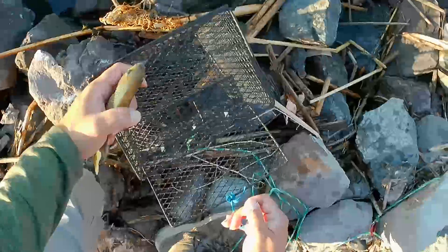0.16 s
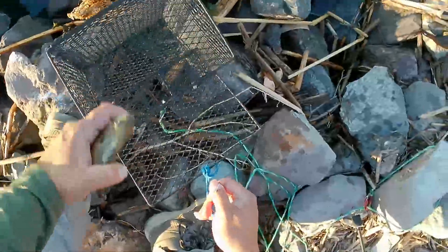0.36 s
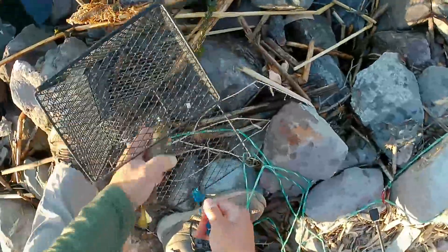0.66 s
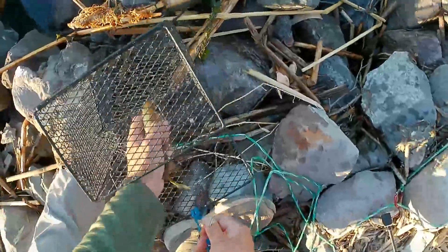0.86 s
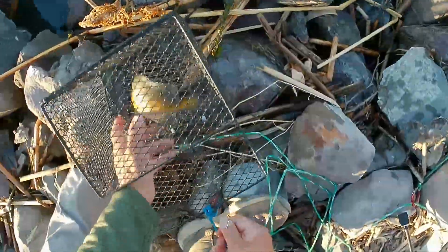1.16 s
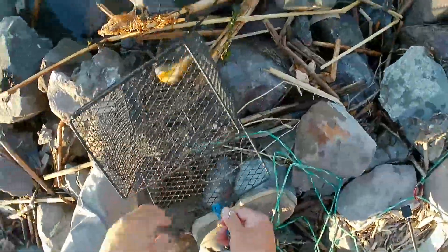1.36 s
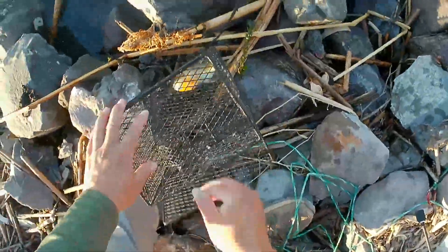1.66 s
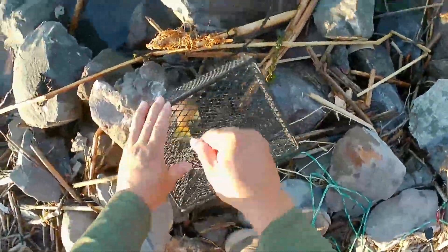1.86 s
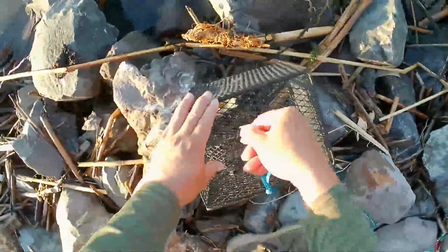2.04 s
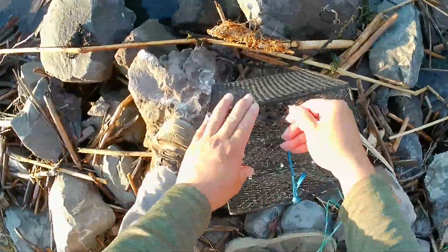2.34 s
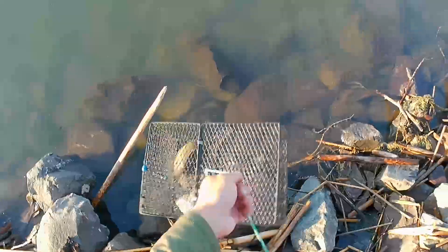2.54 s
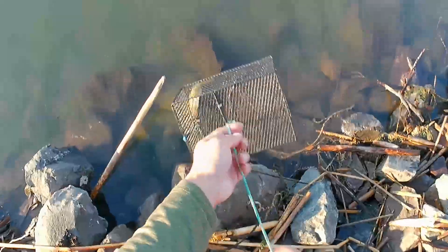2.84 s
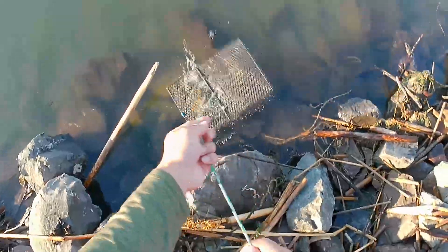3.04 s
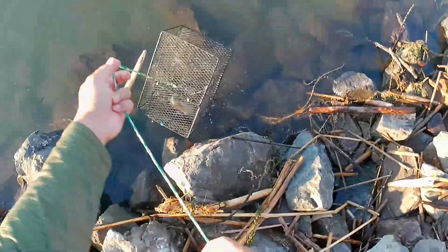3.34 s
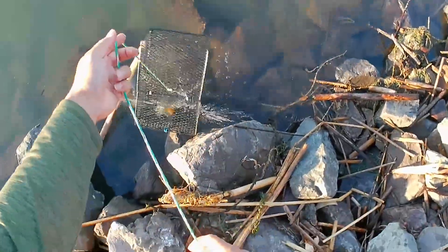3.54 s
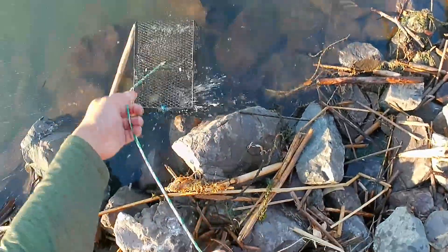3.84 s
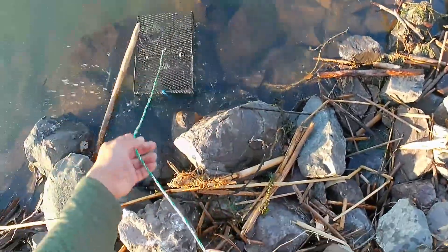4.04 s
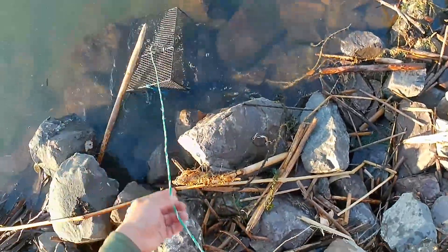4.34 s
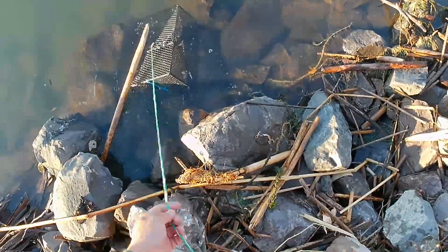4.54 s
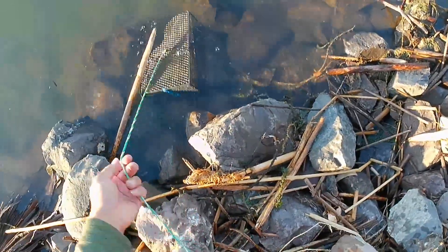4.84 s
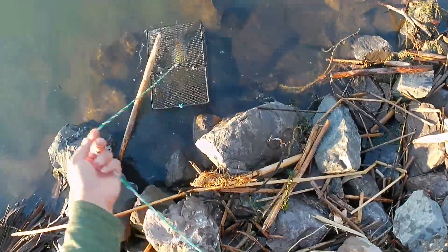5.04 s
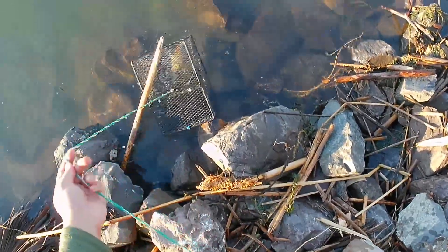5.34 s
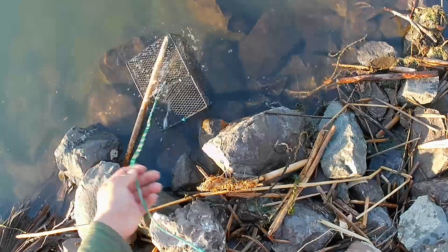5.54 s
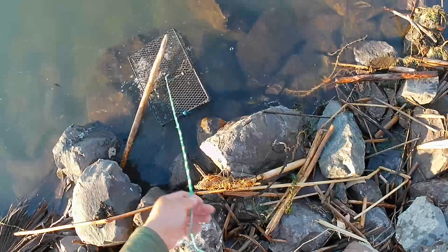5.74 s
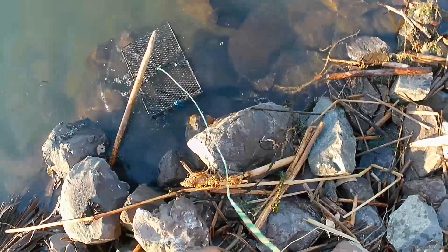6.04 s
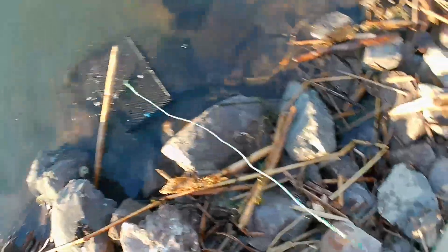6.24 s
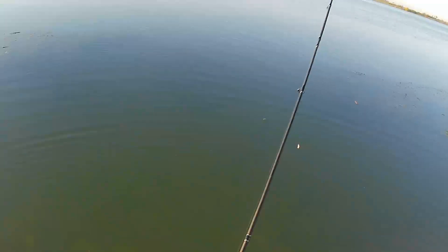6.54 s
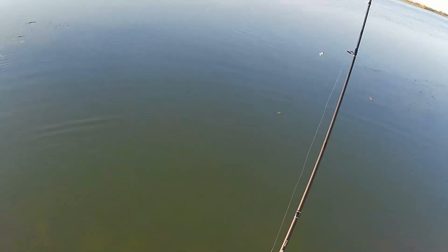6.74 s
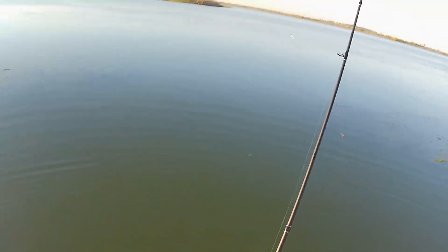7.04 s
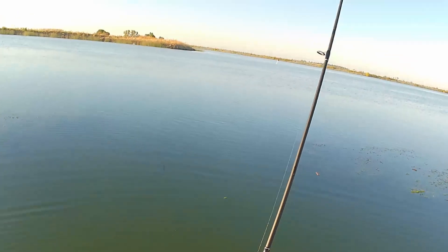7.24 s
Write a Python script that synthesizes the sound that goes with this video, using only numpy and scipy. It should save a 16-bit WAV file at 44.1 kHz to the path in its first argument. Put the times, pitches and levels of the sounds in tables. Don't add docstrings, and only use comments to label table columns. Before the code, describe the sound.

Sharp metal mesh knocks and light scrapes, a wet plunge with repeated sloshing and droplets, then quiet rumble and one handling bump.

```python
import sys
import numpy as np
from scipy import signal
from scipy.fft import rfft, irfft, next_fast_len
from scipy.io import wavfile
from scipy.ndimage import uniform_filter1d

SR = 44100
rng = np.random.default_rng(int(sys.argv[2]) if len(sys.argv) > 2 else 0)


def gain_from_decibels(decibels):
    exponent = np.asarray(decibels, float) / 20
    return 10 ** exponent


def transcribe(u):
    v = np.clip(np.atleast_2d(u).T, -1, 1)
    q = np.round(v * 32767).astype(np.int16)
    wavfile.write(sys.argv[1], SR, q)


N = 325899

# frequency in Hz, density in dB per Hz.
SHORE_COLOUR = [(4.7, -29), (8.0, 3), (21, -0.5), (43, -2.5), (90, -6.5), (140, -17.5), (186, -22),
                (248, -28), (282, -33.5), (426, -35.5), (500, -37), (831, -40.5), (1960, -50.5),
                (14100, -59), (16000, -57.5)]
# frequency in Hz, width in Hz, level in dB.
ENGINE_LINES = [(119, 6.5, -70), (162, 5.8, -70), (207, 7, -75), (255, 9, -80), (425, 9, -86)]
# frequency in Hz, level in dB.
WHINE_LINES = [(431, -78.5), (651, -84)]

# start in seconds, peak in dB, frequency in Hz, t60 in seconds.
KNOCKS = [(.595, -48.5, 230, 0.034), (1.228, -30.5, 110, .03), (1.248, -41.5, 514, .027),
          (1.278, -37, 208, 0.025), (1.297, -46.5, 483, 0.022), (1.298, -56, 900, .025),
          (1.281, -58, 850, .025), (1.23, -50, 450, .025), (1.248, -50, 900, 0.023), (1.452, -46, 800, .02),
          (1.555, -46, 250, .03), (1.451, -30.5, 275, 0.026), (1.479, -36, 825, 0.062),
          (1.8, -42, 189, 0.043), (1.81, -50, 300, .04), (1.764, -54, 450, .03), (2.106, -42.5, 230, 0.03),
          (6.396, -53, 400, .066), (6.4015, -38, 890, .012), (6.407, -30, 274, .03),
          (7.203, -50, 190, 0.062)]
# start in seconds, peak in dB, frequency in Hz, t60 in
# seconds.
HEAVES = [
    (1.262, -30.5, 53, 0.085),
    (1.341, -29.5, 16.7, 0.97),
    (6.236, -32, 19, 0.3),
    (6.279, -23.5, 24.4, 0.17),
    (6.313, -28.5, 31.4, 0.2),
    (6.357, -26, 16, 0.16),
]
# frequency in Hz, peak in dB, t60 in seconds.
FRAME_MODES = [(194, -24, 0.045), (450, -25.5, 0.018), (1200, -38, .02), (2340, -39, 0.027)]
# start in seconds, peak in dB, frequency in Hz, t60 in seconds.
WIRE_PINGS = [
    (2.158, -56, 1550, .03),
    (2.159, -60, 2750, .025),
    (2.158, -61, 4800, .02),
    (2.114, -60, 1050, .03),
    (2.113, -64, 2200, .025),
    (2.205, -64, 3100, .02),
    (1.481, -50, 1150, .04),
    (1.484, -54, 550, .05),
    (1.486, -54, 2500, .03),
]
# frequency in Hz, peak in dB, t60 in seconds.
HOUSING_MODES = [(498, -31, 0.028), (700, -27.5, 0.0087), (860, -34, 0.016), (1000, -29.5, 0.017),
                 (1430, -49, .017), (2570, -41, 0.016), (3400, -55, 0.016), (4330, -49, .014),
                 (5000, -57, .015), (10250, -29.5, 0.0059)]

# start in seconds, peak, low part and high part in dB, t60 in seconds.
BAIT_SNAPS = [(1.2104, -37, -8, 7.5, 0.027), (1.2483, -41, -4, 5, 0.027), (1.278, -57.5, -7, 0, .051),
              (1.2944, -63, -3, -8, .05), (1.3267, -56, -5, -4, .1), (1.362, -56, -6, -1, 0.068),
              (1.376, -65, 4, 2, .075), (1.441, -54, -3, 4, 0.067), (1.4515, -49, -6, -2, 0.049),
              (1.474, -31.5, 1, 2, 0.025), (1.488, -42, -2, -6, .028), (1.505, -68, -3, 15, .023),
              (1.557, -50.5, -6, -2, 0.036), (1.6255, -65, -3, 11.5, 0.033)]
# start in seconds, peak, low part and high part in dB, t60 in seconds.
DOOR_SCRAPES = [(1.7464, -60, -5, -5, .05), (1.762, -51.5, -4, -2, 0.1), (1.7982, -43.5, -10, 0, 0.036),
                (1.808, -47, 1.5, 2, .038), (1.8351, -61, 0, -10, .034), (1.844, -60.5, -11, 4, .04),
                (1.8562, -61.5, 2, -7, .062), (2.1118, -52.5, -10, 0.5, 0.054), (2.1356, -59, -5, -9, .044),
                (2.158, -46, -8, 3, 0.023), (2.1979, -58, -13, 1, 0.064), (2.204, -52.5, -1, -1, .038),
                (2.2274, -68, 4, -1, .04), (2.382, -67, -1, 4, .048), (2.4004, -63, -3, -3, .04),
                (2.4136, -69, 4.5, -1, .12)]
# start in seconds, peak, low part and high part in dB, t60 in seconds.
TAP_GRIT = [
    (6.4027, -53.5, 15, -13, 0.023),
    (6.4074, -61, 2, -11, .04),
]

# time in seconds, fizz level in dB, gurgle level in dB.
SPRAY_LEVELS = [
    [(2.82, -76, -86), (2.95, -84, -117), (3.074, -52.5, -51.5), (3.222, -66, -83), (3.3, -73, -70)],
    [(3.3, -67, -87), (3.376, -72, -85), (3.622, -71.5, -78), (3.762, -61.5, -66), (3.89, -73, -70),
     (4.016, -63, -77), (4.11, -76, -71.5), (4.55, -80, -82)],
    [(5.0, -79, -80), (5.5, -78.5, -93), (5.576, -66, -71), (5.706, -67, -76), (5.838, -73, -79),
     (5.95, -85, -78)],
]
# frequency in Hz, density in dB per Hz.
FIZZ_COLOUR = [(710, -39), (1200, -42), (1600, -17), (1870, -7), (2930, -3), (6090, -8.5), (10700, -4),
               (14000, -22)]

# start in seconds, peak, low part and high part in dB,
# t60 in seconds.
SURGES = [(2.86, -60.5, -15, -2, 0.52), (3.027, -47.5, -19, 4, .08), (3.04, -45, -15, -3, 0.085),
          (3.055, -38.5, -6, -13, 0.094), (3.072, -37.5, -7, -3, 0.065), (3.095, -53, -6, -6, .17),
          (3.76, -60, 11, -5, 0.33), (3.98, -60, 5, -8, .22), (5.65, -57, 2, -17, 0.2),
          (5.51, -65, 2, -10, .3), (5.78, -66, 3, -10, .2), (3.12, -60, 3.5, -10, .3)]
# start in seconds, peak, low part and high part in dB.
PLUNGE_SLAPS = [(3.0, -59, -8, -8), (3.0353, -52, -10, -4), (3.0472, -46, -8, -6), (3.0657, -42, -4, -6),
                (3.083, -45, -4, 2), (3.1114, -56, -6, -8), (3.1344, -51, -5, -9), (3.1682, -47.5, -7, 1),
                (3.2203, -51, 5, -7), (3.2369, -40.5, -10, -14), (3.2438, -47, 1, 7), (3.322, -59, 14, -13),
                (3.361, -53, -10, -5), (3.3698, -51, -5, -5), (3.3866, -49.5, 9.5, 12.5),
                (3.397, -68, 2, 5), (3.4406, -59, 0, -8)]
# start in seconds, peak, low part and high part in dB.
DIP_SLAPS = [(3.569, -43.5, -5, 1), (3.598, -58, -5, 6), (3.618, -48.5, -7, -8), (3.664, -37.5, -31, -2),
             (3.698, -44, -13, 0.5), (3.733, -42, -22, -2), (3.7444, -53, -10, -1), (3.7607, -47, -13, 0),
             (3.778, -43, -20, -3), (3.794, -41.5, -18, 1), (3.8233, -47, -15, 7), (3.8637, -52, -13, -12),
             (3.889, -51, 0, -7), (3.909, -54, -12, 0), (3.984, -42, -9, 2.5), (4.0253, -58, 2, 5),
             (4.0315, -58, 9, -10), (4.072, -51, -5, -5), (4.1799, -57, -14, -11), (4.2083, -59, -6, -1),
             (4.2924, -59, -5, 4), (4.335, -58, -11, -1), (4.359, -54.5, 2, -6), (4.464, -53.5, -21, -7)]
# start in seconds, peak, low part and high part in dB.
SINK_SLAPS = [(5.08, -54.5, 2, -7), (5.111, -57, -2, -15), (5.2594, -57.5, -3, -11), (5.311, -58, 1, -12),
              (5.4664, -62, 2, 7), (5.5317, -53, -6, 4), (5.5434, -47.5, -6, 2), (5.5504, -47, -14, -4),
              (5.562, -54, 2, -1), (5.5986, -43, -2, -2), (5.623, -50, -4, 0), (5.6464, -57, -11.5, 1),
              (5.663, -37, -21, -15), (5.69, -37, -27, -32), (5.71, -51, -12, 3), (5.762, -47.5, -10, 0.5),
              (5.79, -51, -3, 1), (5.7952, -52, 0, -4), (5.8076, -48, -0.5, -8), (5.832, -52, -10, -17),
              (5.849, -56, -16, -1)]

# start in seconds, peak in dB, frequency in
# Hz.
PLAIN_BUBBLES = [(3.061, -47, 2860), (3.071, -49.5, 362), (3.086, -47, 1580), (3.0944, -42, 5940),
                 (3.104, -49, 3880), (3.124, -57, 1940), (3.138, -53, 1780), (3.143, -56, 2670),
                 (3.167, -61, 1890), (3.174, -57, 780), (3.235, -59, 1500), (3.257, -60, 1000),
                 (3.232, -51, 2880), (3.325, -62, 1240), (3.358, -48.5, 1900), (3.39, -56, 533),
                 (3.399, -49, 4050), (3.441, -62, 4270),
                 (3.516, -63, 2350), (3.57, -61, 850), (3.637, -59, 4610), (3.665, -48, 3030),
               (3.665, -47, 4410), (3.666, -42, 5860), (3.681, -52, 3700), (3.698, -60, 2850),
               (3.701, -55.5, 1700), (3.78, -52.5, 3360), (3.786, -54, 470), (3.825, -61, 2370),
               (3.928, -63, 1940), (3.969, -54.5, 2660), (3.976, -59.5, 1080), (3.983, -57, 2200),
               (4.026, -54, 3550), (4.066, -61, 3270), (4.144, -61, 2370), (4.289, -62, 5300),
               (4.335, -48, 8600), (4.336, -54, 5400), (4.36, -62.5, 2580), (4.293, -59, 8040),
               (4.465, -64, 790), (4.836, -61.5, 8600),
                 (5.08, -63, 710), (5.112, -66, 724), (5.49, -63, 1300), (5.548, -54, 2800),
                (5.622, -55, 1750), (5.624, -60, 4670), (5.663, -55, 2840), (5.662, -49, 1523),
                (5.687, -50.5, 1700), (5.692, -52, 5200), (5.692, -50, 3400), (5.723, -58.5, 1640),
                (5.762, -62, 3140), (5.808, -55.5, 2440),
                 (3.035, -55, 2850), (3.036, -53, 5210), (3.051, -50, 2650), (3.065, -49, 1610),
            (3.071, -44, 4690), (3.073, -48, 4200), (3.116, -53, 5430), (3.157, -65, 1250),
            (3.192, -64, 1360), (3.153, -58, 2100), (3.171, -55, 4300), (3.619, -65, 1180),
            (3.684, -65, 1120), (3.7, -52, 4840), (3.735, -51, 4740), (3.726, -63, 1900),
            (3.794, -48, 4650), (3.793, -58, 1700), (3.806, -60, 1500), (3.866, -57, 4250),
            (3.989, -51, 6610), (3.997, -61, 1900), (4.019, -58, 2900), (4.035, -60, 2900),
            (4.058, -66, 1490), (5.6, -52, 5730), (5.6, -62, 1000), (5.662, -53, 5900), (5.691, -49, 2710),
            (5.711, -51, 7350), (5.623, -58, 3500), (5.676, -58, 1800), (5.704, -58, 2500),
            (5.832, -60, 4390), (5.849, -59, 4530), (5.82, -64, 1500)]
# start in seconds, peak in dB, frequency in Hz.
GURGLES = [(3.05, -58, 996), (3.102, -53, 994), (3.13, -64, 427), (3.175, -64, 450), (3.666, -66, 1700),
           (3.805, -54, 780), (3.809, -60, 995), (3.84, -62, 430), (3.864, -67, 480), (4.033, -51, 516),
           (4.361, -65, 1500), (4.435, -65, 706), (5.552, -61.5, 694), (5.572, -65, 747),
           (5.569, -67, 1870), (5.592, -66, 3010), (5.747, -66, 940), (5.855, -71, 2160)]
# start in seconds, peak in dB, frequency in Hz, ring factor,
# climb as a share of the frequency.
CHIRPS = [(3.062, -55, 1030, 1.5, .1), (3.08, -52.5, 1000, 1.6, .2), (3.238, -62, 990, 1.6, .1),
          (3.236, -58, 3300, 3.3, 1.5), (4.018, -64, 1190, 2.2, .1), (4.075, -65, 730, 1.2, .2),
          (4.385, -64, 810, 2.6, .9), (4.59, -75, 550, 5.0, .05), (5.86, -59.5, 930, 2.4, .8),
          (3.795, -57.5, 520, 1.44, 1.2), (4.374, -66, 1230, 2.4, -.7), (3.775, -60, 620, 1.2, .4),
          (3.78, -57, 410, 1.4, .1), (3.812, -58, 320, 1.2, .1), (3.825, -61, 650, 1.3, .3),
          (3.368, -61, 2600, 1.3, .2), (3.369, -62, 3900, 1.3, .2), (3.359, -60, 3600, 1.3, .2),
          (3.325, -62, 2000, 1.3, .1), (3.446, -65, 2100, 1.4, .4), (3.52, -67, 1000, 2.0, .1),
          (3.56, -65, 900, 1.5, .1), (3.577, -63, 800, 1.3, .8), (5.668, -62, 1600, 2.4, .5),
          (5.894, -67, 2560, 2.8, .05), (4.47, -74, 2300, 2.5, .1), (5.81, -70, 1450, 3.0, .3),
          (5.535, -69, 2300, 2.5, .8), (3.115, -58, 400, 1.5, .2)]

# start, end and ramp in seconds, depth in dB, overshoot as
# a share, creep in seconds.
OFFSET_STEP = (6.4131, 6.4441, .0022, -21.6, .5, .006)
# start in seconds, end in seconds.
DULL_SPANS = [(1.227, 1.245), (1.462, 1.471), (1.51, 1.521), (1.781, 1.797), (2.101, 2.111), (2.123, 2.156),
              (3.359, 3.385), (3.553, 3.568), (3.616, 3.662), (3.723, 3.732), (6.389, 6.399),
              (6.411, 6.449)]


def at_hz(points, hz):
    known_hz, known_db = np.array(points).T[:2]
    return np.interp(np.log(hz), np.log(known_hz), known_db)


def rms_one(x):
    return x / np.sqrt(np.mean(x ** 2) + 1e-20)


def band(x, low_hz, high_hz):
    edges = [low_hz, min(high_hz, 0.45 * SR)]
    return signal.sosfilt(signal.butter(2, edges, "band", fs=SR, output="sos"), x)


def add(out, s, sound):
    i = round(s * SR)
    out[i:i + len(sound)] += sound[:N - i]


def shore():
    size = next_fast_len(N)
    hz = np.maximum(np.fft.rfftfreq(size, 1 / SR), 1)
    coloured = rfft(rng.standard_normal(size)) * gain_from_decibels(at_hz(SHORE_COLOUR, hz))
    whole = irfft(coloured, size)[:N]
    lows = irfft(coloured / (1 + (hz / 300) ** 4), size)[:N]
    gusts_per_s, gust_db = 4.0, 2.2
    gust = np.interp(np.arange(N) / SR * gusts_per_s, np.arange(100), rng.standard_normal(100))
    return gain_from_decibels(-44.5) * rms_one(whole + (gain_from_decibels(gust_db * gust) - 1) * lows)


def narrow(noise, hz, width_hz):
    r = np.exp(-np.pi * width_hz / SR)
    poles = [1, -2 * r * np.cos(2 * np.pi * hz / SR), r * r]
    return rms_one(signal.lfilter([1, 0, -1], poles, noise))


def far():
    t, noise = np.arange(N) / SR, rng.standard_normal(N)
    rustle_db, rustle_t60_s, rustle_rise_s = -58, 0.6, 0.11
    rustle_shape = gain_from_decibels(rustle_db - 60 * t / rustle_t60_s) * np.minimum(t / rustle_rise_s, 1) ** 2
    rustle = rustle_shape * rms_one(band(noise[::-1], 140, 600))
    drone = sum(gain_from_decibels(db) * narrow(noise, hz, width) for hz, width, db in ENGINE_LINES)
    start_s, end_s, fade_s = 6.58, 7.22, 0.072
    swell = np.clip(np.minimum(t - start_s, end_s - t) / fade_s, 0, 1)
    whine = swell * sum(gain_from_decibels(db) * narrow(noise, hz, width_hz=5.0) for hz, db in WHINE_LINES)
    return drone + whine + rustle


def knocks():
    out, t = np.zeros(N), np.arange(SR // 2) / SR
    frame = [(1.4742, db, hz, t60) for hz, db, t60 in FRAME_MODES]
    tap = [(6.4043, db, hz, t60) for hz, db, t60 in HOUSING_MODES]
    for s, peak_db, hz, t60 in [*KNOCKS, *WIRE_PINGS, *frame, *tap, *HEAVES]:
        swell = 1 - np.exp(-t * min(hz * 11.0, 3000))
        add(out, s, gain_from_decibels(peak_db - 60 * t / t60) * swell * np.sin(2 * np.pi * hz * t))
    return out


def gritty(size, spread_db):
    strength = gain_from_decibels(spread_db * np.minimum(rng.exponential(1, size), 5))
    return rms_one(strength * rng.standard_normal(size))


def bursts(rows, grains, low_hz, trim_db):
    out, t = np.zeros(N), np.arange(12000) / SR
    low = band(grains, low_hz, 2500)
    middle = band(band(grains, 2300, 7500), 2300, 7500)
    high = band(band(grains, 7000, 18000), 7000, 18000)
    for s, peak_db, low_db, high_db, t60, rise in rows:
        attack = np.minimum(t / max(rise, 1e-4), 1) ** 1.17
        decay = gain_from_decibels(-60 * np.maximum(t - rise, 0) / max(t60, 0.003))
        at = slice(round(s * SR), round(s * SR) + len(t))
        mix = middle[at] + gain_from_decibels(low_db) * low[at] + gain_from_decibels(high_db) * high[at]
        add(out, s, gain_from_decibels(peak_db + trim_db) * attack * decay * mix)
    return out


def snaps():
    rise_s = 0.0016
    rows = [(*row, rise_s) for row in [*BAIT_SNAPS, *DOOR_SCRAPES, *TAP_GRIT]]
    return bursts(rows, gritty(N, spread_db=5.5), low_hz=450, trim_db=2.0)


def ring(clicks, hz, t60):
    r, w = gain_from_decibels(-60 / (t60 * SR)), 2 * np.pi * hz / SR
    return signal.lfilter([0, np.sin(w)], [1, -2 * r * np.cos(w), r * r], clicks + 1e-18)


def swarm(pitches, colour_db, per_s, cycles, spread_db, clump_db):
    sizes = gain_from_decibels(spread_db * np.minimum(rng.exponential(1, N), 5)) * rng.choice([-1, 1], N)
    born = rng.random(N) < per_s / SR
    dealt = rng.integers(0, len(pitches), N)
    knots = np.arange(N // 400 + 2)
    clumps = rng.standard_normal((len(pitches), len(knots)))
    out = 0
    for k, hz in enumerate(pitches):
        clump = np.interp(np.arange(N) / 400, knots, clumps[k])
        gain = gain_from_decibels(colour_db[k] + clump_db * clump)
        out = out + ring(gain * sizes * born * (dealt == k), hz, cycles / hz + 0.0011)
    return rms_one(out)


def in_time(rows, silent_db=-110):
    s, *columns = np.transpose(rows)
    return [np.interp(np.arange(N) / SR, s, c, left=silent_db, right=silent_db) for c in columns]


def spray():
    levels = [in_time(rows) for rows in SPRAY_LEVELS]
    fizz = sum(gain_from_decibels(fizz_db) for fizz_db, _ in levels)
    gurgle = sum(gain_from_decibels(gurgle_db) for _, gurgle_db in levels)
    fine = np.geomspace(1300, 13000, 20)
    drops = np.geomspace(1100, 6000, 14)
    coarse = np.geomspace(330, 1600, 10)
    fine_db = at_hz(FIZZ_COLOUR, fine) + 20 * np.log10(fine / fine[0])
    mist = swarm(fine, fine_db, per_s=16000, cycles=17.0, spread_db=5.5, clump_db=3.5)
    drips = swarm(drops, np.zeros(14), per_s=350, cycles=49.0, spread_db=8.0, clump_db=7.0)
    large = swarm(coarse, np.zeros(10), per_s=1500, cycles=4.5, spread_db=2.0, clump_db=2.5)
    return fizz * (mist + gain_from_decibels(-12.5) * drips) + gurgle * large


def slaps():
    sizes = np.geomspace(380, 13000, 28)
    colour_db = 14.9 * np.log10(sizes / sizes[0])
    cloud = swarm(sizes, colour_db, per_s=20000, cycles=12.2, spread_db=3.0, clump_db=5.0)
    surges = [(*row, 0.16 * row[-1]) for row in SURGES]
    t60_s, rise_s = 0.036, 0.0042
    hits = [(*row, t60_s, rise_s) for row in [*PLUNGE_SLAPS, *DIP_SLAPS, *SINK_SLAPS]]
    return bursts(surges + hits, cloud, low_hz=412, trim_db=-5.0)


def bubbles():
    out, t = np.zeros(N), np.arange(8000) / SR
    plain = PLAIN_BUBBLES
    rows = [(*row, 1, 0.28) for row in plain]
    rows += [(*row, 1.9, 0.25) for row in GURGLES]
    rows += [*CHIRPS]
    for s, peak_db, hz, longer, climb in rows:
        speed, phase = rng.random(2)
        t60 = longer * 0.024 * (1000 / hz) ** 0.71
        pitch = hz * (0.96 + climb * np.minimum(t / t60, 1))
        wobble_hz = 60 + 94 * speed
        pitch *= 1 + 0.032 * np.sin(2 * np.pi * (wobble_hz * t + phase))
        swell = 1 - np.exp(-t * hz * 0.35)
        tone = np.sin(2 * np.pi * np.cumsum(pitch) / SR)
        add(out, s, gain_from_decibels(peak_db + 11.0 - 60 * t / t60) * swell * tone)
    return out


def port(x):
    return signal.sosfilt(signal.butter(6, 9840, fs=SR, output="sos"), x) + gain_from_decibels(-13.0) * x


def offset_step(x):
    start, end, ramp, depth_db, overshoot, creep = OFFSET_STEP
    t = np.arange(N) / SR
    held = np.clip((t - start) / ramp, 0, 1) * np.clip((end + ramp - t) / ramp, 0, 1)
    held = uniform_filter1d(held, size=14)
    relaxing = np.exp(-np.maximum(t - start - ramp, 0) / creep)
    offset = gain_from_decibels(depth_db) * (1 + overshoot * relaxing)
    return x * (1 - 0.3 * held) - offset * held


def dull_near_hits(x):
    t = np.arange(N) / SR
    inside = sum(1.0 * ((t > start) & (t < end)) for start, end in DULL_SPANS)
    spans = uniform_filter1d(inside, size=150)
    dull = signal.sosfiltfilt(signal.cheby2(10, 30, 13000, fs=SR, output="sos"), x)
    return x + spans * (dull - x)


def scene():
    near = port(snaps() + spray() + slaps() + bubbles())
    return offset_step(shore() + far() + knocks() + near)[None]


def roll_off(x):
    return signal.sosfilt(signal.butter(12, 16470, fs=SR, output="sos"), x)


def record(dry):
    limited = signal.sosfilt(signal.cheby2(14, 32, 16000, fs=SR, output="sos"), dry)
    return roll_off(dull_near_hits(limited))


dry = scene()
out = record(dry)
transcribe(out)
```